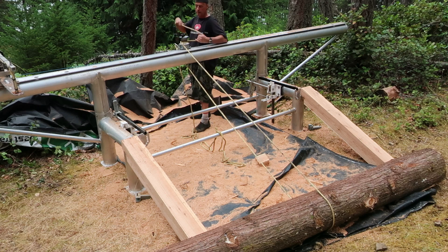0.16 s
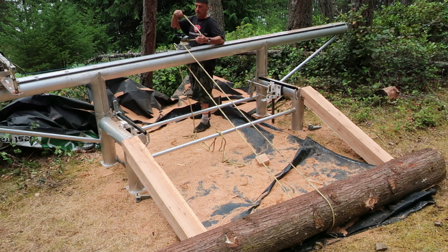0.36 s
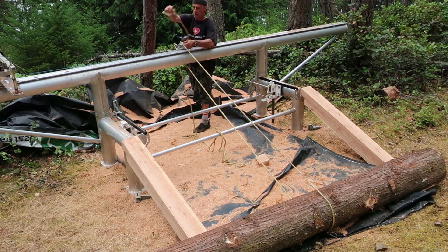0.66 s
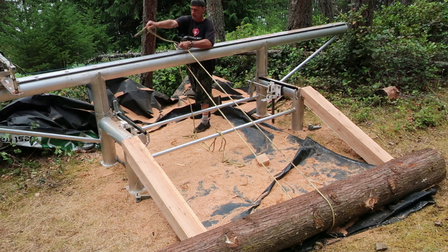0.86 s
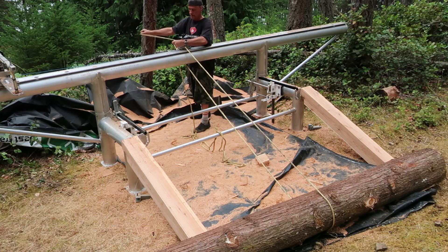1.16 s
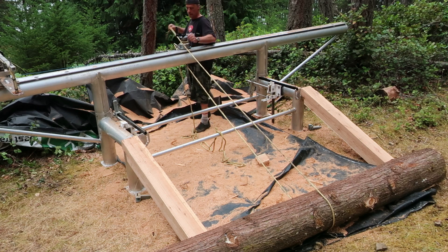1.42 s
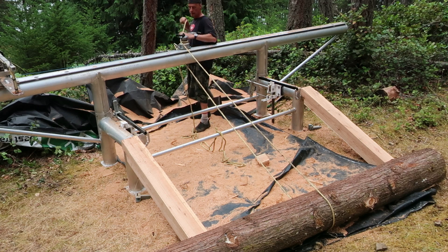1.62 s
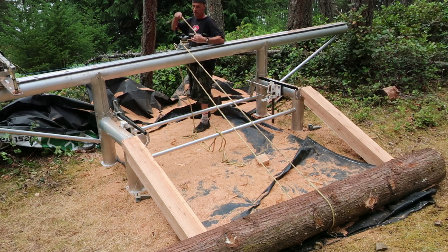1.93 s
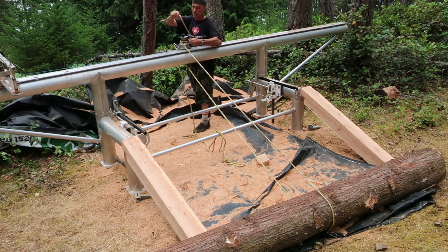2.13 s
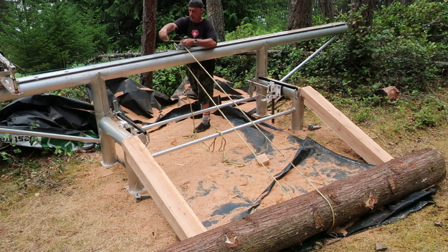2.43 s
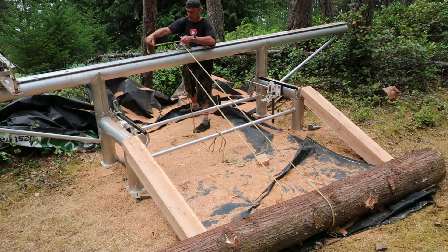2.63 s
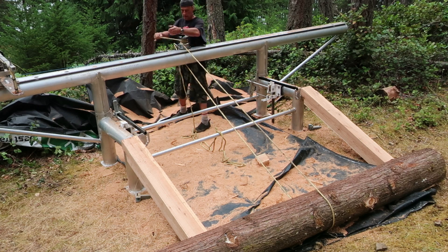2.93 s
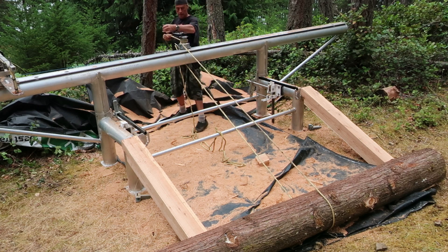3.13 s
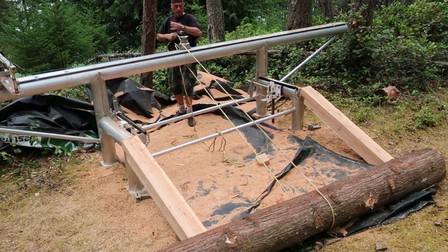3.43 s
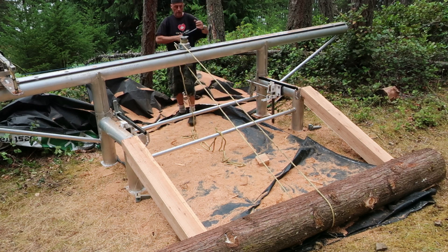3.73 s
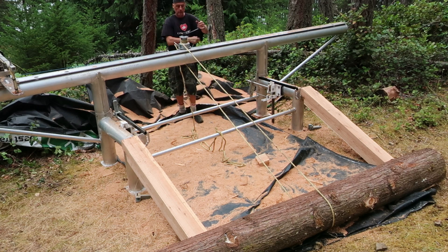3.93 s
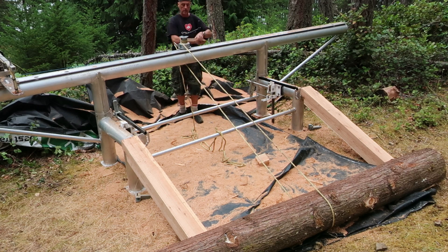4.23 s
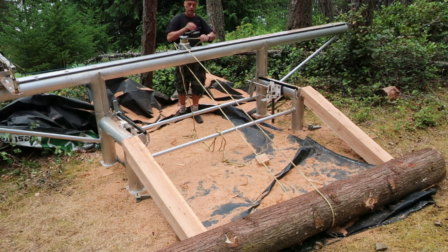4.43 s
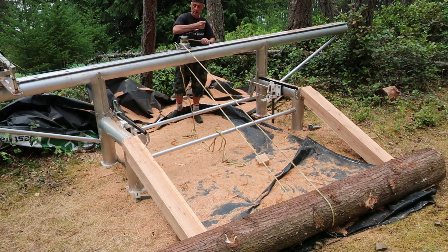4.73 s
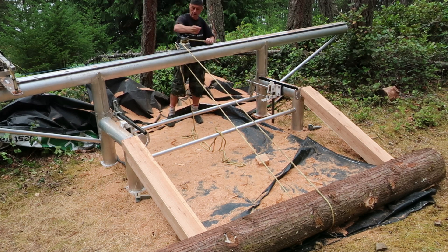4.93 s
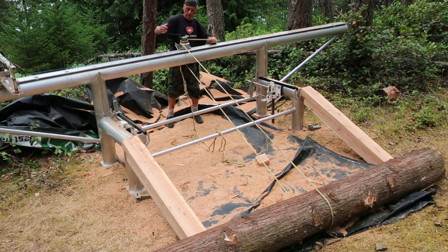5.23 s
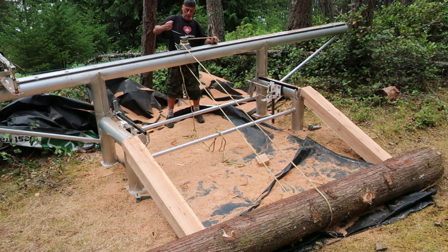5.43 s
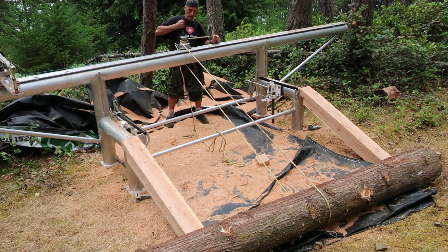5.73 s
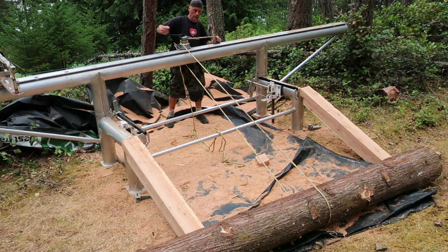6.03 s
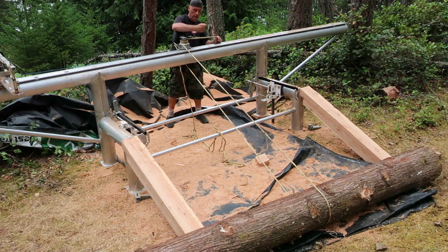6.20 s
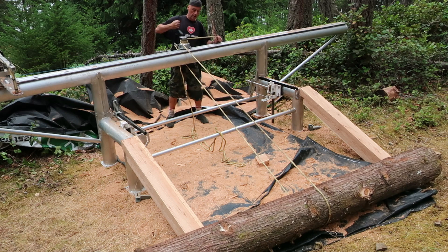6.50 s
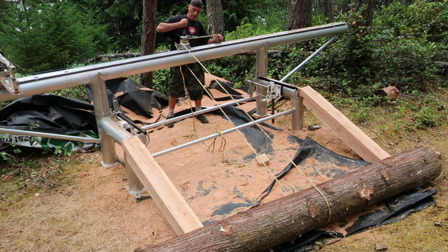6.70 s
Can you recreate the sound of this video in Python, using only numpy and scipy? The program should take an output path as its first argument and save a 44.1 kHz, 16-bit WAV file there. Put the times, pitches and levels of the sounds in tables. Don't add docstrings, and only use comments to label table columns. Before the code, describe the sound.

A hand winch works close to a small camera microphone in a breezy forest clearing. At 0.04-0.18 s six sharp ratchet clicks rattle past with a hollow metal knock and small clinks; another knock follows at 0.35. Breeze dominates until a dry snap at 1.0 and ringing beam clanks at 1.3-1.4. After another lull, rope creaks and scrapes from 2.5, with a loud snap at 2.68 and fibres popping to 3.0. A long, brisk ratchet run fills 3.04-3.9, with a heavy clank at 3.68. Knocks and slips at 4.1 lead to scattered snaps, then hard knocks at 4.8. Clicking resumes at 4.87-5.12 with a fierce crack at 5.03, continuing softer to 5.76. Lighter ticks speed up, then slow, from 5.98 to 6.6. Loud jolts at 6.75 precede one last hard click at 6.81. Short tree echoes trail the blows, and the loudest hits overload.

```python
import sys
import numpy as np
from scipy import signal
from scipy.io import wavfile
from scipy.ndimage import uniform_filter1d

SR = 44100
rng = np.random.default_rng(int(sys.argv[2]) if len(sys.argv) > 2 else 0)


def to_wav(sig):
    pcm = np.clip(np.atleast_2d(sig), -1, 1) * 32767
    pcm = np.round(pcm).astype(np.int16)
    wavfile.write(sys.argv[1], SR, pcm.T)


def gain_from_db(level_db):
    decades = np.asarray(level_db, float) / 20
    return 10 ** decades


N = 302443

# [t/s, peak level/dB]
TEETH_A = [
    (0.0426, -8.5),
    (0.0736, -5),
    (0.099, -12),
    (0.1225, -4),
    (0.146, -5),
    (0.177, -9),
]
TEETH_B = [(3.037, -22), (3.0726, -4), (3.138, -5.5), (3.21, -9.5), (3.25, -5), (3.286, -9), (3.318, -7),
           (3.347, -8), (3.377, -7.5), (3.412, -5.5), (3.443, -7.5), (3.472, -8), (3.5001, -6),
           (3.5264, -4.5), (3.5497, -4), (3.5757, -5), (3.602, -5.5), (3.627, -7), (3.652, -8),
           (3.6779, -2), (3.704, -11), (3.7393, -11), (3.7762, -8), (3.819, -9.5), (3.8675, -10.5),
           (3.9201, -7.5)]
TEETH_C = [
    (4.87, -5.5),
    (4.9076, -6),
    (4.931, -5.5),
    (4.9554, -8),
    (4.977, -10),
    (5.014, -7),
    (5.0562, -14),
    (5.077, -8),
    (5.0992, -6),
    (5.1241, -1.5),
]
TEETH_D = [(5.171, -17), (5.1926, -10), (5.217, -11), (5.2422, -10), (5.27, -7.5), (5.297, -12.5),
           (5.3253, -10.5), (5.3567, -10.5), (5.387, -12), (5.413, -12), (5.441, -11.5), (5.465, -12.5),
           (5.4886, -14.5), (5.512, -25), (5.5366, -13.5), (5.5655, -12), (5.605, -10.5), (5.645, -16),
           (5.6788, -7), (5.7131, -8.5), (5.762, -10)]
LAST_TOOTH = [
    (6.8108, -1.5),
]
# [gear level/dB, top sizzle re pawl/dB]
TEETH_COLOUR = [
    (-19.5, -33),
    (-18.5, -12),
    (-17, -17),
    (-20.5, -14),
    (-15, -27),
]
# [t/s, peak level/dB]
LIGHT_TEETH = [(5.978, -20.5), (6.0197, -18), (6.06, -20), (6.099, -16), (6.1306, -20), (6.159, -16.5),
               (6.186, -19), (6.213, -13.5), (6.236, -15), (6.259, -22), (6.2807, -12.5), (6.303, -13),
               (6.3269, -10), (6.351, -12), (6.375, -11.5), (6.406, -15), (6.4321, -13), (6.4686, -10),
               (6.5103, -11), (6.559, -14), (6.6103, -12)]
# [f/Hz, level/dB, t60/s]
PAWL_MODES = [(3540, -12.5, 0.018), (4170, -5.5, 0.019), (4410, -2.5, 0.015), (4700, -8.5, 0.016),
              (4797, 4.5, 0.013), (5000, -3, 0.015), (5200, -6, 0.014), (5560, -11, 0.015),
              (6370, -16, 0.025), (7410, -6, 0.024), (7400, -41, 0.054)]
GEAR_MODES = [(1151, -8.5, 0.14), (1345, -8.5, 0.14), (1650, -5.5, 0.079), (1900, -6, 0.021),
              (2270, -6.5, 0.079), (2450, -4.5, 0.068), (2673, -0.5, 0.031), (3230, 3.5, 0.008)]
LIGHT_LOW_MODES = [(1149, 1.5, 0.04), (1400, -8, 0.061), (1690, 10, 0.0058), (2270, 14, 0.0065),
                   (2430, -8, 0.027), (2470, 0, 0.038), (2620, -10, 0.026), (3180, 0, 0.012)]
LIGHT_HIGH_MODES = [(3750, -7, 0.03), (4420, -1, 0.025), (4840, 1.5, 0.02), (6160, -5.5, 0.012),
                    (6600, 2, 0.01), (7300, -16, 0.01), (9560, -6, 0.0099), (10500, -6, 0.011)]
# [rub at full speed/dB, top hiss re rub/dB]
WINDING = [
    (-35.5, -3.5),
    (-31.5, -11.5),
    (-38.5, -8.5),
    (-36, -11),
    (-42, -33),
]
# [start t/s, end t/s, rub at start/dB, rub at end/dB, decay/(dB/s)]
SLIPS = [(0.18, 0.3, -44, -52, 150), (4.15, 4.24, -46, -50, 200), (5.86, 5.95, -43, -47, 150),
         (2.472, 2.645, -48.5, -46, 300), (2.68, 2.982, -32.5, -21.5, 900), (4.08, 4.104, -37.5, -44, 298),
         (4.572, 4.812, -46, -35.5, 200), (4.945, 5.042, -27, -24.5, 101), (5.616, 5.685, -40, -31.5, 148),
         (6.534, 6.628, -50, -43.5, 352), (6.69, 6.856, -47, -32, 95)]
# [f/Hz, level/dB per Hz]
RUB_COLOUR = [(410, -30), (700, 0), (1160, -4), (1490, -4), (1720, -7), (2150, -4), (4500, -6), (9000, -21),
              (11700, -51), (19800, -120)]
# [t/s, peak level/dB, edge re body/dB, tilt/(dB/octave)]
KNOCKS = [(0.0835, -1, -15, -8), (0.35, -5.5, -16, -5), (0.36, -12, -14, -5), (0.989, -28.5, -9, -4),
          (1.3185, -3.5, -20, -2), (1.417, -27, -40, -1), (3, -23, -11, -7), (3.171, -7, -15.5, -4),
          (3.208, -10, -8, -1), (3.217, -7.5, -18, -4), (3.858, -3.5, -12, -2), (4.082, -1.5, -15, 6),
          (4.699, -26.5, -1, -13), (4.763, -15, -14, -7), (4.823, -1.5, -7, 4), (4.852, -19, -14, -8),
          (5.1345, -3, -9, 0.2), (5.86, -12, -11, -15), (6.122, -17.5, -28, 0), (6.684, -13.5, -21, -19),
          (6.817, -8, -21, 4)]
JOLTS = [(1.339, -11.5, -13, 1), (1.372, -6.5, -17, -6), (2.459, -23, -16, -15.5), (2.679, -17.5, 6.5, 16),
         (3.237, -14, -25, -14), (3.68, 1.5, -7.5, 0), (3.833, -6.5, -16.5, 1), (4.069, -10.5, -9, -13),
         (4.113, -9, -23, 6), (5.258, -12, -29, -6), (5.582, -5, -19, 5), (5.6, -12, -19, -13),
         (5.897, -13, -16, -6), (6.747, -3.5, -6.5, 7), (6.772, -0.5, -13.5, -7)]
# [t/s, level/dB]
THUMPS = [(0.082, -46), (1.318, -25), (1.52, -36), (2.46, -33), (2.61, -29.5), (2.759, -27), (3.001, -24),
          (3.215, -21), (3.678, -25.5), (3.832, -26.5), (3.863, -41), (4.083, -31), (4.825, -22),
          (4.853, -21.5), (5.133, -31), (5.587, -27), (5.857, -29.5), (6.689, -45), (6.746, -26),
          (6.778, -18.5)]
# [f/Hz, level/dB, t60/s]
BODY_MODES = [(150, -25, 0.042), (228, -29, 0.021), (296.4, -18.5, 0.27), (294, -2.5, 0.036),
              (390, 2, 0.016), (430.5, -1.5, 0.18), (474, -0.5, 0.077), (560, -8.5, 0.065),
              (615, 5.5, 0.039), (662.7, -3.5, 0.19), (751, -23, 0.35), (849, -13, 0.3), (412, 1.5, 0.017),
              (936, -6.5, 0.14)]
EDGE_MODES = [(1037, 4, 0.064), (1330, -10, 0.067), (1400, 6, 0.035), (1646, 9, 0.065), (1853, 11, 0.018),
              (2030, 5, 0.046), (2270, 20, 0.011), (2620, 12, 0.013), (2860, 0.5, 0.034),
              (3370, -18, 0.025)]
# [t/s, peak level/dB, f/Hz, t60/s]
SINGING = [(0.086, -6, 564, 0.062), (0.397, -30, 2640, 0.083), (3.6805, -9, 720, 0.059),
           (4.086, -11, 436, .05), (5.583, -9, 653, .1), (5.584, -12, 565, .08), (0.353, -11, 305, .12),
           (1.3205, -11, 590, .08), (5.589, -15, 834, 0.091), (6.1, -19, 2540, 0.046),
           (6.123, -20, 396, 0.098), (0.0851, 0, 369, 0.083), (0.087, -4, 304, 0.1),
           (0.352, -19, 854, 0.12), (1.322, -8, 324, 0.094), (1.371, -22.5, 1490, 0.12),
           (1.39, -11.5, 665, 0.27), (2.68, -9.5, 2270, 0.053), (3.173, -5, 422, 0.084),
           (3.211, -7.5, 270, .12), (3.681, -4.5, 290.6, 0.1), (3.6807, -1.5, 2870, 0.033),
           (3.681, -9, 2630, 0.042), (3.682, -10, 1330, 0.084), (3.833, 0, 278, 0.064),
           (3.858, -10.5, 1630, 0.074), (3.867, 1, 275, 0.055), (3.869, -11, 486, 0.044),
           (4.068, -17, 2410, 0.043), (4.084, -5.5, 298, 0.052), (4.0855, -3.5, 692, 0.041),
           (4.115, -17, 763, .1), (4.825, -2.5, 268, 0.04), (4.826, -9, 840, 0.086),
           (5.136, -0.5, 419.6, 0.088), (5.137, -24, 668, 0.17), (5.138, -17.5, 767, 0.67),
           (5.15, -22, 287, .2), (5.289, -19, 272, 0.095), (5.369, -18.5, 384, 0.075),
           (5.584, -9, 413, 0.083), (5.862, -32, 1400, 0.032), (5.863, -13.5, 423, 0.11),
           (6.023, -22.5, 2510, 0.042), (6.062, -28, 2480, 0.046), (5.903, -12, 440, .1),
           (6.131, -19, 2550, 0.041), (6.162, -26, 2530, .05), (6.752, -5.5, 260, 0.14),
           (6.753, -10.5, 780, 0.11)]
# [t/s, peak level/dB, f/Hz]
CLINKS = [(0.0478, -15.5, 2620), (0.1216, -19, 2560), (0.137, -13, 2610), (0.153, -14, 2680),
          (0.166, -17, 2500), (0.186, -21, 2530), (4.697, -17, 1400), (5.647, -24, 2240), (5.68, -19, 2260),
          (5.715, -14, 2250), (5.763, -18, 2200), (0.2864, -16.5, 2580), (1.262, -20.5, 2705),
          (4.6845, -12, 2650)]
# [t/s, peak level/dB, f/Hz]
SNAPS = [(0.8303, -21, 3630), (0.989, -8.5, 2620), (1.328, -12.5, 3760), (2.6105, -16, 2450),
         (2.6249, -15, 2740), (2.6754, 5.5, 2380), (2.688, -5, 2600), (2.698, -12, 2000),
         (2.7314, -21, 3380), (2.804, -13, 3680), (2.8599, -29, 3230), (3.0124, -24, 2800),
         (4.0605, -18, 2230), (4.0634, -10, 2500), (4.4744, -23, 4400), (4.557, -20.5, 2310),
         (4.6586, -14, 5200), (4.688, -14, 2000), (4.7306, -19, 2450), (4.748, -19, 4310),
         (4.7942, -8, 2200), (5.0295, -0.5, 3570), (5.0512, -16, 4560), (5.8547, -11, 2200),
         (6.7284, -27, 2570), (6.7507, -6, 2270)]
THIN_SNAPS = [(0.4584, -27.5, 5170), (1.064, -25, 6200), (1.217, -28, 4700), (2.1392, -24, 4700),
              (2.6413, -12.5, 5130), (2.807, -15, 6900), (2.956, -19, 6600), (4.115, -11, 5130),
              (4.148, -19, 4850), (4.1934, -26.5, 10500), (4.578, -42, 5560), (4.6015, -25, 5660),
              (4.6283, -22, 5400)]
# [t/s, peak level/dB, f/Hz]
FIBRES = [(2.7014, -10, 2240), (2.7314, -13, 3330), (2.7704, -17, 2710), (2.804, -11, 3650),
          (2.8268, -17, 2320), (2.8599, -13, 3230), (2.9054, -10, 2620), (2.9154, -11, 2570),
          (2.9364, -10, 2320), (2.946, -2, 2080), (2.9567, -15, 3990), (2.9724, -10, 3560),
          (2.9834, -3, 2030), (4.9724, -11, 4510), (4.9954, -11, 2220), (5.0074, -9, 2320),
          (5.0184, -7, 2000), (5.035, 9, 3710), (5.0494, -2, 3750), (5.0604, -13, 4880),
          (5.0884, -16, 4110), (5.0914, -18, 4900)]
# [t/s, peak level/dB, f/Hz]
SPLINTERS = [(1.0645, -34, 12000), (4.571, -36, 12500), (4.579, -32, 13000), (4.6, -35, 12500),
             (4.607, -35, 12500), (4.659, -29, 12500), (4.667, -33, 12000), (4.824, -20, 8000),
             (5.136, -17, 10000), (5.667, -24, 5000), (5.878, -27, 4500), (6.693, -32, 9000),
             (6.746, -24, 10000), (4.004, -30, 4000), (3.439, -26, 8000)]
# [f/Hz, -1 to 1]
BREEZE = [(20, -21), (35, -9), (65, 1.5), (120, -2.5), (250, -2), (480, -7.5), (700, -11), (1000, -13),
          (2000, -19), (4000, -25.5), (6300, -33), (10000, -39), (15000, -40.5)]
LIKENESS = [(60, 1), (240, -0.099), (950, -0.2), (3770, -0.39), (15000, -0.49)]
# [f/Hz, rms level/dB]
WHINE = [
    (15197, -85),
]

SPREAD_DB = 2.2
GEAR_FOLLOWS, MEAN_TOOTH_DB = 0.38, -11.5
FULL_SPEED_TEETH_PER_S = 40
LIGHT_HIGH_DB, HIGH_DB_PER_DOUBLING = -8.5, 4.5
RUB_DB_PER_DOUBLING, COAST_DB_PER_S, GRIP_DB_PER_S = 6.5, 149, 311
SLIP_HISS_DB = -11.5
RUMBLE_FOLLOWS, MEAN_RUB_DB = 0.72, -34.5
RUMBLE_RE_RUB_DB, SHUDDER_RE_KNOCK_DB, SHUDDER_T60_S = 5.5, -16, 0.68
KNOCK_CONTACT_S, JOLT_CONTACT_S = 0.0037, 0.013
SWELL_S = 0.00483
TREES_T60_S, TREES_DB = 0.17, -10.5
BREEZE_DB = -32


def ratchet():
    runs = [TEETH_A, TEETH_B, TEETH_C, TEETH_D, LAST_TOOTH]
    teeth = [(*tooth, *colour) for run, colour in zip(runs, TEETH_COLOUR) for tooth in run]
    s, peak_db, gear_db, top_db = np.transpose(teeth)
    bursts = contacts(s, np.full(len(s), .005), rise_s=.0025, first=.25)
    pawl = strike(PAWL_MODES, s, bursts, peak_db - 9.5)
    gear = strike(GEAR_MODES, s, bursts, gear_db + GEAR_FOLLOWS * (peak_db - MEAN_TOOTH_DB) - 8.0)

    rattle = contacts(s, np.full(len(s), .007), rise_s=0.0011, first=0)
    crack = band(lay(s, rattle, gain_from_db(peak_db + 5.5)), 1200, 9400)
    tip = band(lay(s, rattle, gain_from_db(peak_db + top_db + 16.0)), 9350, 14700)
    narrow = band(lay(s, bursts, gain_from_db(peak_db + top_db + 7.5)), 12800, 13000)
    sizzle = gain_from_db(1.5) * band(narrow, 12500, 13000) + gain_from_db(-4.0) * tip
    return band(pawl + gear, 710, 4460) + crack + sizzle


def light_run(rub_db):
    s, peak_db = np.transpose(LIGHT_TEETH)
    bright_db = HIGH_DB_PER_DOUBLING * np.log2(1 / np.gradient(s) / FULL_SPEED_TEETH_PER_S)
    high_db = LIGHT_HIGH_DB + bright_db
    bursts = contacts(s, np.full(len(s), .012), rise_s=.002, first=.2)
    turning = np.interp(np.arange(N) / SR, [s[0], s[3], s[-1], s[-1] + .04], [0, 1, 1, 0])
    whirr = rng.standard_normal(N) * turning * gain_from_db(rub_db - 23.0)
    low = strike(LIGHT_LOW_MODES, s, bursts, peak_db - 16.0 + 0.46 * bright_db,
                 tilt_db=-.3 * bright_db, rub=whirr)
    high = strike(LIGHT_HIGH_MODES, s, bursts, peak_db + high_db - 9.5, rub=whirr * gain_from_db(-31.0))
    crack = band(lay(s, bursts, gain_from_db(peak_db + high_db + 4.0)), 1500, 7600)
    return band(low, 760, 2470) + band(high, 2900, 9300) + crack


def beam(rub_db):
    hits = sorted([(*k, KNOCK_CONTACT_S) for k in KNOCKS] + [(*j, JOLT_CONTACT_S) for j in JOLTS])
    s, peak_db, edge_db, tilt_db, length = np.transpose(hits)
    from_rope_db = MEAN_RUB_DB + RUMBLE_FOLLOWS * (rub_db - MEAN_RUB_DB) + RUMBLE_RE_RUB_DB
    rumble_db = 10 * np.log10(gain_from_db(2 * from_rope_db) + shudder(s, peak_db))
    bursts = contacts(s, length, rise_s=0.002994, first=0.44)
    rumble = rng.standard_normal(N) * gain_from_db(rumble_db - 35.0 + 2.57 * drift(22.4))

    body = strike(BODY_MODES, s, bursts, peak_db - 10.5, tilt_db=tilt_db, rub=rumble)
    deep_force = lay(s, bursts, gain_from_db(peak_db + 19.5 - tilt_db / 2)) + gain_from_db(10.0) * rumble
    deep = blurred(deep_force, 0.35, 219, 515)
    hollow_force = lay(s, bursts, gain_from_db(peak_db + 18.0 + tilt_db / 2)) + gain_from_db(16.0) * rumble
    hollow = blurred(hollow_force, 0.38, 450, 1040)

    edge = strike(EDGE_MODES, s, bursts, peak_db + edge_db - 17.0)
    edge_blur = blurred(lay(s, bursts, gain_from_db(peak_db + edge_db + 20.5)), 0.22, 1000, 2160)

    thump_s, thump_db = np.transpose(THUMPS)
    feet = lay(thump_s, np.ones((len(thump_s), 1)), gain_from_db(thump_db + 33.0))
    thump = blurred(feet + gain_from_db(16.5) * rumble, 0.63, 35.0, 136)
    return band(body + deep + hollow, 163, 1140) + band(edge + edge_blur, 770, 4300) + band(thump, 28, 213)


def shudder(times, peak_db):
    kicks = lay(times, np.ones((len(times), 1)), gain_from_db(2 * (peak_db + SHUDDER_RE_KNOCK_DB)))
    return signal.lfilter([1], [1, -gain_from_db(-120 / (SHUDDER_T60_S * SR))], kicks + 1e-18)


def singing():
    t = np.arange(int(SWELL_S * SR)) / SR
    out = 0
    for s, db, hz, t60 in SINGING:
        push = 2 * np.cos(2 * np.pi * hz * t) / len(t)
        out = out + ring(lay([s], [push], [gain_from_db(db)]), hz, t60)
    return out


def rubbing():
    rub, hiss = 1e-9, 1e-12
    for run, (full_db, hiss_db) in zip([TEETH_A, TEETH_B, TEETH_C, TEETH_D, LIGHT_TEETH], WINDING):
        s = np.array(run)[:, 0]
        speed_db = RUB_DB_PER_DOUBLING * np.log2(1 / np.gradient(s) / FULL_SPEED_TEETH_PER_S)
        power = stretch(s, full_db + speed_db, GRIP_DB_PER_S, COAST_DB_PER_S) ** 2
        rub, hiss = rub + power, hiss + power * gain_from_db(2 * hiss_db)
    for start, end, start_db, end_db, dies in SLIPS:
        power = stretch([start, end], [start_db, end_db], GRIP_DB_PER_S, dies) ** 2
        rub, hiss = rub + power, hiss + power * gain_from_db(2 * SLIP_HISS_DB)
    return 10 * np.log10(rub), 10 * np.log10(hiss)


def rope(rub_db, hiss_db):
    sizes = gain_from_db(4.6 * np.minimum(rng.exponential(1, (2, N)), 5)) * rng.choice([-1, 1], (2, N))
    grains = sizes * (rng.random((2, N)) < 6000 * gain_from_db(2.5 * drift(60)) / SR)
    rub = rms_one(sum(x for hz, x in noise_bands(RUB_COLOUR, grains, patchy_db=1.5, low_hz=640)))
    fine = rms_one(grains + 0.046 * grains[::-1]) + 0.71 * rng.standard_normal((2, N))
    hiss = rms_one(band(band(fine, 9300, 14800), 3100, 11900))
    return gain_from_db(rub_db + 1.5) * rub, gain_from_db(hiss_db - 1 + 2 * drift(12)) * hiss


def snaps(events, crack_db, ring_db, t60, length):
    out = np.zeros(N + 2600)
    s, peak_db, pitch_hz = np.transpose(events)
    bursts = contacts(s, np.full(len(s), length), rise_s=.0004, first=0.78)
    for at, burst, db, hz in zip(s, bursts, peak_db, pitch_hz):
        crack = gain_from_db(crack_db) * band(burst, hz / 5.3, hz * 1.08)
        after = gain_from_db(ring_db) * band(ring(burst, hz, t60), hz / 2, hz * 2)
        start = int(at * SR)
        out[start:start + len(burst)] += gain_from_db(db) * (crack + after)
    return out[:N]


def trees(x):
    return signal.fftconvolve(x[None], dying_noise(TREES_T60_S, 340, 11700, channels=2), axes=1)[:, :N]


def breeze():
    out = 0
    for hz, (mid, side) in noise_bands(BREEZE, rng.standard_normal((2, 2, N)), patchy_db=.5, low_hz=20.17):
        alike = np.clip(at_hz(LIKENESS, hz), -1, 1)
        out = out + np.sqrt(1 + alike) * mid + np.sqrt(1 - alike) * side * [[1], [-1]]
    return gain_from_db(BREEZE_DB) * rms_one(out)


def whine():
    t = np.arange(N) / SR
    return sum(gain_from_db(db + 7.0 + 2.5 * drift(8.0)) * np.sin(2 * np.pi * hz * t) for hz, db in WHINE)


def contacts(times, lengths, rise_s, first):
    t = np.arange(2600) / SR
    shape = np.exp(-t / np.clip(lengths, 2e-4, .03)[:, None]) * np.minimum(t / rise_s, 1)
    rattle = rng.standard_normal((len(times), len(t))) * shape
    rattle /= np.sqrt(np.sum(rattle ** 2, axis=1, keepdims=True))
    rattle[:, int(rise_s * SR)] += first
    return rattle / np.sqrt(1 + first ** 2)


def lay(times, bursts, gains):
    out = np.zeros(N + len(bursts[0]))
    for s, burst, gain in zip(times, bursts, gains):
        start = int(s * SR)
        out[start:start + len(burst)] += gain * burst
    return out[:N]


def strike(modes, times, bursts, level_db, tilt_db=0, rub=0):
    luck = SPREAD_DB * rng.standard_normal((len(times), len(modes)))
    out = 0
    for k, (hz, db, t60) in enumerate(modes):
        blow_db = level_db + luck[:, k] + tilt_db * np.log2(hz / 450)
        out = out + gain_from_db(db) * ring(lay(times, bursts, gain_from_db(blow_db)) + rub, hz, t60)
    return out


def ring(force, hz, t60):
    r, w = gain_from_db(-60 / (t60 * SR)), 2 * np.pi * hz / SR
    return signal.lfilter([0, np.sin(w)], [1, -2 * r * np.cos(w), r * r], force + 1e-18)


def blurred(force, t60, low_hz, high_hz):
    return signal.oaconvolve(force, dying_noise(t60, low_hz, high_hz, channels=1)[0])[:N]


def dying_noise(t60, low_hz, high_hz, channels):
    t = np.arange(SR // 2) / SR
    fade = gain_from_db(-60 * t / t60) * np.minimum(t / 0.00082, 1)
    tail = band(rng.standard_normal((channels, len(t))) * fade, low_hz, high_hz)
    return tail / np.sqrt(np.sum(tail ** 2) / channels)


def noise_bands(spectrum, white, patchy_db, low_hz):
    together = drift(2.5)
    edges = low_hz * 2 ** np.arange(0, np.log2(16500 / low_hz), .5)
    for k, low in enumerate(edges):
        hz = low * 2 ** .25
        flicker = gain_from_db(at_hz(spectrum, hz) + patchy_db * (2.1 * together + drift(31.0)))
        yield hz, flicker * band(white[k % 2], low, low * np.sqrt(2))


def stretch(times, level_db, rise_db_per_s, fall_db_per_s):
    t = np.arange(N) / SR
    before_db = rise_db_per_s * np.maximum(times[0] - t, 0)
    after_db = fall_db_per_s * np.maximum(t - times[-1], 0)
    return gain_from_db(np.interp(t, times, level_db) - before_db - after_db)


def drift(rate):
    r = np.exp(-40 * np.pi * rate / SR)
    slow = signal.lfilter([1], [1, -2 * r, r * r], rng.standard_normal(N // 20 + 4002))[4000:]
    return np.interp(np.arange(N) / 20, np.arange(len(slow)), rms_one(slow))


def at_hz(points, hz):
    return np.interp(np.log(hz), np.log(np.array(points)[:, 0]), np.array(points)[:, 1])


def rms_one(x):
    return x / np.sqrt(np.mean(x ** 2) + 1e-20)


def band(x, low_hz, high_hz):
    sos = signal.butter(2, [low_hz, min(high_hz, .45 * SR)], "band", fs=SR, output="sos")
    return signal.sosfilt(sos, x)


def scene():
    rub_db, hiss_db = rubbing()
    rub, hiss = rope(rub_db, hiss_db)
    cracks = snaps(SNAPS + THIN_SNAPS, crack_db=16.5, ring_db=-22.0, t60=0.046, length=0.0049)
    clinks = snaps(CLINKS, crack_db=8.0, ring_db=-6.0, t60=.025, length=.01)
    fibres = snaps(FIBRES, crack_db=-1.0, ring_db=-8.0, t60=0.0045, length=0.00059)
    splinters = snaps(SPLINTERS, crack_db=12.0, ring_db=-20.0, t60=.004, length=0.0015)
    winch = ratchet() + light_run(rub_db) + cracks + clinks + rub
    frame = beam(rub_db) + singing()
    near = winch * gain_from_db(np.array([[.9], [-.9]])) + frame * gain_from_db(np.array([[-.2], [.2]]))
    echoes = gain_from_db(TREES_DB) * trees(winch + 0.37 * frame)
    return near + echoes + hiss + breeze() + fibres + splinters


def low_pass(x):
    return signal.sosfilt(signal.butter(12, 15600, fs=SR, output="sos"), x)


def record(dry):
    heard = signal.sosfilt(signal.butter(12, 14200, fs=SR, output="sos"), dry) + whine()
    level_db = 20 * np.log10(uniform_filter1d(np.abs(heard).max(axis=0), size=200) + 1e-6)
    fall_db = 28.3 * np.arange(N) / SR
    held_db = np.maximum.accumulate(level_db + fall_db) - fall_db
    over_db = 0.89 * np.maximum(held_db + 10, 0)
    cut_db = signal.lfilter([.001], [1, -.999], over_db)
    return low_pass(np.clip(heard * gain_from_db(-cut_db), -.99, .99))


dry = scene()
out = record(dry)
to_wav(out)
```